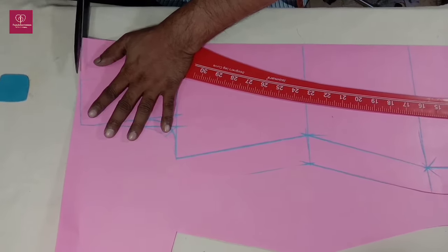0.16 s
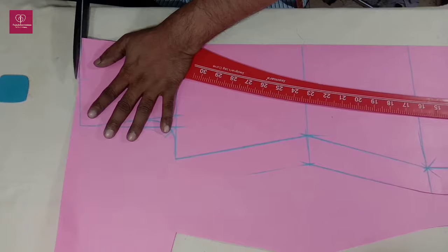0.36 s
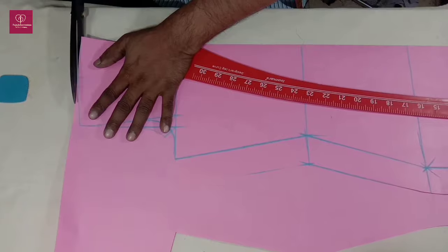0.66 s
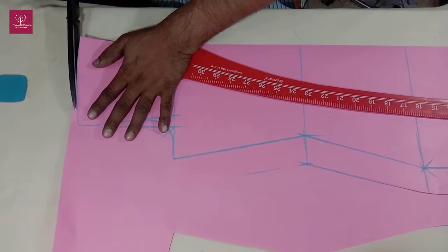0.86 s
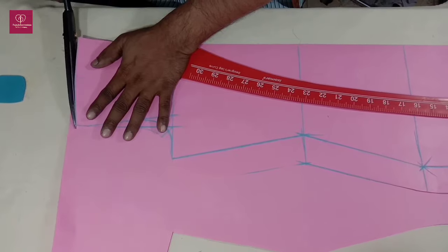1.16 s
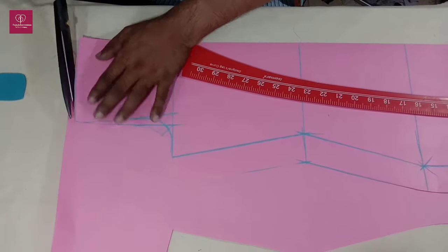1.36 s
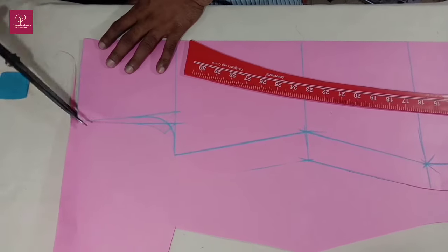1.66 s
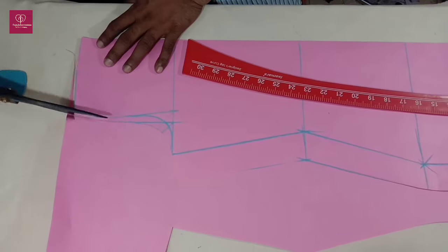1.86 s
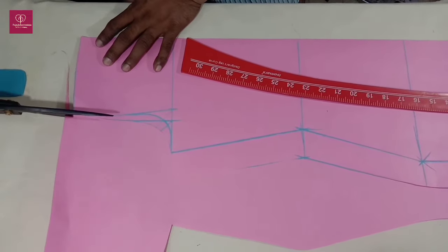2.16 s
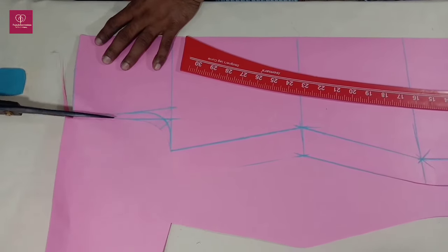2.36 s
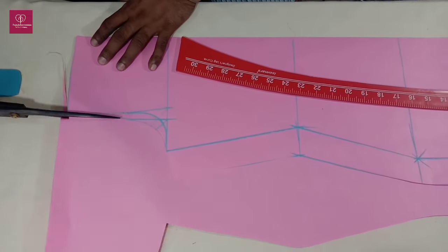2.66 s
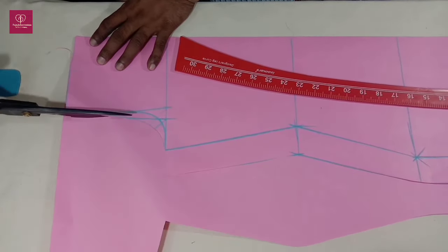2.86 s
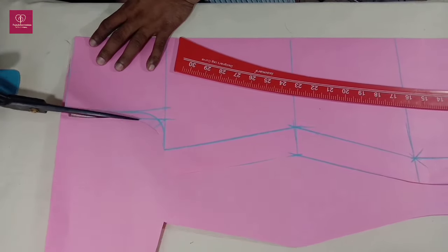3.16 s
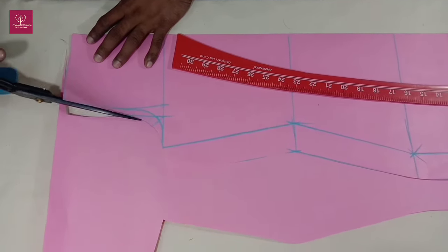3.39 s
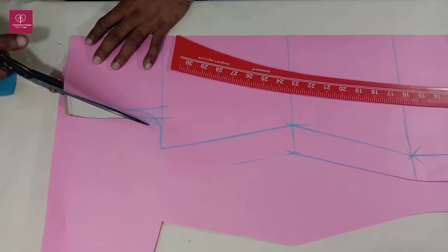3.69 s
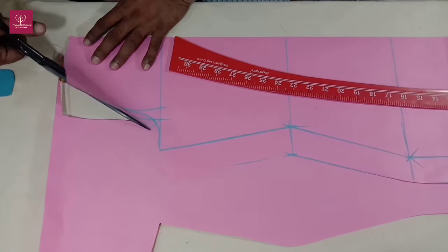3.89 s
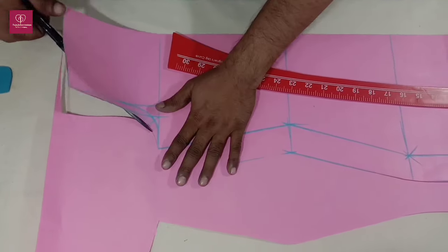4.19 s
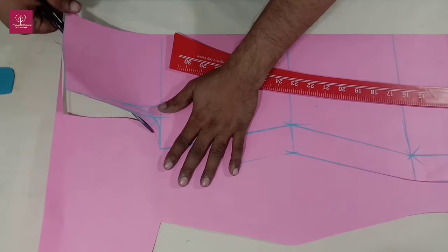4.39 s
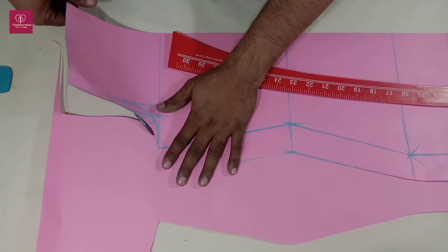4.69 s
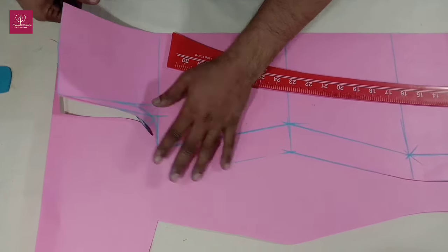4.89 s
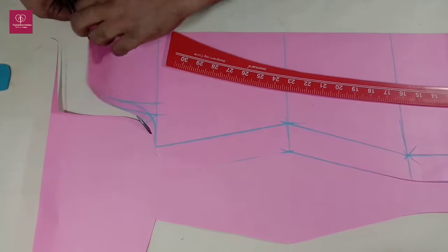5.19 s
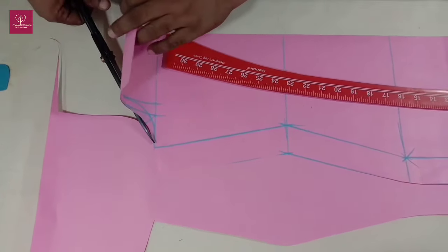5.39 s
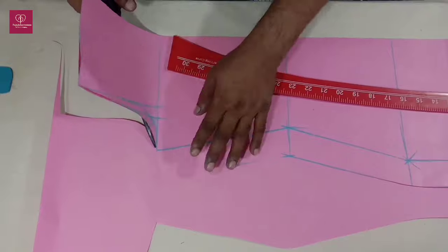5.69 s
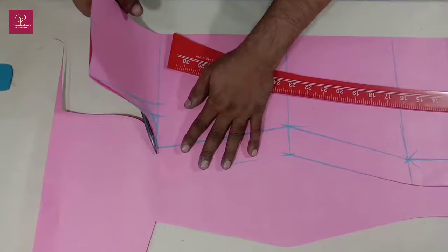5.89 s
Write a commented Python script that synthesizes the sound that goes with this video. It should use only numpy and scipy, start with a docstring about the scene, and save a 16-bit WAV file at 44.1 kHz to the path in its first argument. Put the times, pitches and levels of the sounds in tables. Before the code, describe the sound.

Crisp scissor cuts through pattern paper lying on a table, heard very near. Loud quick clips come first, then the sheet rustles and shifts, then a long run of short crackling snips with papery shaking. Tiny metallic ticks, sharp creasing snaps and dull table bumps punctuate it. The indoor space is small and nearly silent, with barely any echo.

```python
"""Scissors work quickly along a sheet of pattern paper lying on a table, close to the microphone.
Each blade stroke is a dense crackle of tearing fibres, ringing the blades and shaking the sheet.
Noise bursts make the snaps of the stiff sheet, decaying sines the bright ticks and the table knocks.
Grainy hiss and rumble make the sliding paper; a quiet small room answers over faint air noise.
The microphone's response climbs from 2 to 7 kHz and drops off above that."""
import sys
import numpy as np
from scipy import signal
from scipy.fft import rfft, irfft, next_fast_len
from scipy.io import wavfile
from scipy.ndimage import uniform_filter1d, map_coordinates

SR = 44100
rng = np.random.default_rng(int(sys.argv[2]) if len(sys.argv) > 2 else 0)


def log_audio(samples):
    """Write samples as a 16-bit WAV file to the path given in sys.argv[1]."""
    # one column per channel
    frames = np.atleast_2d(samples).T
    # limit to full scale, then quantise
    limited = np.clip(frames, -1, 1)
    pcm = np.round(limited * 32767).astype(np.int16)
    wavfile.write(sys.argv[1], SR, pcm)


N = 266805
TURN_S = 1.45  # the edge strip is off and the blades turn into the sheet


def amp(db):
    """Decibels to linear gain."""
    return 10 ** (np.asarray(db) / 20)


def unit(x):
    """Scale to an rms of 1."""
    return x / np.sqrt(np.mean(x ** 2) + 1e-20)


def along(points, hz):
    """Read a (frequency, value) curve on a log frequency axis."""
    f, value = np.transpose(points)
    return np.interp(np.log(hz + 1), np.log(f + 1), value)


def filtered(x, response):
    """Multiply the spectrum of x by a complex response of frequency."""
    m = next_fast_len(N + SR // 2)
    return irfft(rfft(x, m) * response(np.fft.rfftfreq(m, 1 / SR)), m)[:N]


def ringing(x, peaks):
    """Pass x through causal resonances, scaled so that white noise keeps its level."""
    def response(f):
        total = 0
        for k, (centre, width, db) in enumerate(peaks):
            resonance = 1j * f * width / (centre * centre - f * f + 1j * f * width)
            total = total + (-1) ** k * amp(db) * resonance  # signs alternate
        return unit(np.abs(total)) * np.exp(1j * np.angle(total))
    return filtered(x, response)


def rung(layer, rings):
    """Ring the part before the turn with the first set of peaks, the rest with the second."""
    early = np.arange(N) < TURN_S * SR
    return ringing(layer[:N] * early, rings[0]) + ringing(layer[:N] * ~early, rings[1])


def wobble(rate):
    """A smooth random curve with rate knots a second."""
    knots = rng.standard_normal(int(N * rate / SR) + 4)
    return map_coordinates(knots, [np.arange(N) * rate / SR])


def crackle(rate, spread_db, clump_db):
    """Clumped clicks, rate a second and widely scattered in size, over a little noise; rms 1."""
    struck = rng.random(N) < rate / SR
    clicks = struck * rng.standard_normal(N) * amp(spread_db * rng.standard_normal(N))
    grit = unit(clicks) + .5 * rng.standard_normal(N)
    grit = unit(grit * amp(clump_db * wobble(300)))
    return unit(np.tanh(grit / 5))  # soft limit on the tallest clicks


# blade strokes, those that follow closely being one cut:
# start_s [s], length_s [s], level_db [dB], sheet_db [dB, sheet relative to the stroke]
STROKES = [(0.0, 0.011, -48.5, -5), (0.274, 0.029, -24, -26), (0.301, 0.021, -23, -13),
           (0.447, 0.059, -40.5, -8.5), (0.538, 0.028, -22, -20), (0.573, 0.016, -21.5, -15),
           (0.676, 0.098, -50.5, -6), (0.805, 0.0092, -30.5, -6.5), (0.821, 0.026, -27, -6.5),
           (0.853, 0.017, -38.5, -2.5), (0.937, 0.071, -47.5, -24), (1.026, 0.02, -39, -3),
           (1.049, 0.014, -28.5, -8), (1.067, 0.026, -41, -1), (1.194, 0.036, -40, -6),
           (1.211, 0.032, -29.5, -10.5), (1.243, 0.013, -57, 7), (1.542, 0.015, -39.5, -9.5),
           (2.328, 0.069, -52, 3.5), (2.397, 0.03, -43, 3.5), (2.428, 0.017, -35, -5),
           (2.49, 0.018, -42.5, -3), (2.699, 0.031, -38, -2.5), (2.721, 0.039, -34, -3),
           (2.808, 0.033, -40.5, -8), (2.855, 0.075, -39.5, -13.5), (2.972, 0.016, -38, -2.5),
           (2.992, 0.045, -35.5, -2), (3.087, 0.076, -43.5, -12.5), (3.189, 0.024, -34, -2),
           (3.223, 0.017, -30.5, -1), (3.245, 0.013, -37.5, -6), (3.399, 0.018, -38, -2),
           (3.421, 0.0085, -32.5, -3), (3.454, 0.022, -33, -9), (3.571, 0.029, -36, -4.5),
           (3.599, 0.013, -31, -8), (3.655, 0.097, -44.5, -5.5), (3.747, 0.02, -38.5, -4.5),
           (3.769, 0.022, -28.5, -8), (3.838, 0.097, -42.5, -6.5), (3.941, 0.021, -29, -7),
           (3.968, 0.061, -38, -5.5), (3.992, 0.065, -38.5, -11), (4.18, 0.032, -41.5, -4.5),
           (4.214, 0.022, -35.5, -6.5), (4.245, 0.01, -33.5, -9), (4.39, 0.0098, -39, -5.5),
           (4.421, 0.031, -29, -10), (4.511, 0.028, -47, -4), (4.547, 0.074, -41, -9.5),
           (4.662, 0.025, -45, -6.5), (4.717, 0.011, -29, -11), (4.751, 0.036, -27.5, -14.5),
           (4.863, 0.044, -43, -11), (4.919, 0.048, -49.5, -15.5), (5.133, 0.04, -45, -3.5),
           (5.302, 0.044, -42, -12.5), (5.568, 0.015, -37, -13.5), (5.587, 0.029, -42.5, -10),
           (5.636, 0.019, -35.5, -10.5), (5.663, 0.018, -30.5, -7.5), (5.76, 0.12, -42, -12),
           (5.896, 0.017, -40.5, -2.5), (5.971, 0.033, -40, -4.5), (6.006, 0.018, -35, -4.5),
           (6.027, 0.019, -45, -9)]
PAUSE_S = .022  # a longer pause starts a new cut


def cut_starts():
    """For each stroke, when the cut that it belongs to began."""
    start_s, length_s = np.transpose(STROKES)[:2]
    pause_s = start_s[1:] - (start_s + length_s)[:-1]
    fresh = np.append(True, pause_s > PAUSE_S)
    return np.maximum.accumulate(start_s * fresh)


# the blades spring open after a trimming cut: start_s [s], level_db [dB]
OPENINGS = [(0.047, -40), (0.386, -43.5), (0.646, -46.5), (0.911, -46.5), (1.128, -37), (1.308, -37)]
# upper over lower rings once a cut reaches the tips: tip_db [dB], trimming then deep in the sheet
TIP_BRIGHTNESS = [-4, -2.5]
HARD_DB = -35.5  # a stroke above this level bites hard
TIP_PER_DB = 0.21  # dB brighter at the tips per dB of hard bite
PIVOT_DB, PIVOT_PER_DB = 1.5, 1.2  # dB duller at the pivot, and dB more per dB of hard bite
SWELL_DB = -3  # level change over a stroke
LEAN = 0.42  # a stroke swells towards a louder one next in the same cut, dB per dB
OPEN_S, OPEN_FADE_DB, OPEN_SHEET_DB = 0.018, -5.5, -14.5  # length, level change, sheet level
OPEN_BRIGHT_DB = 4.5  # upper over lower rings, for openings and flaps
FLAP_S, FLAP_DB, FLAP_FADE_DB, FLAP_SHEET_DB = .05, -53.5, -6, 4  # the freed strip flaps


def gestures():
    """Rows of start, length [s], level, swell, sheet, tip brightness, pivot dullness [dB], cut start [s]."""
    start_s, length_s, level_db, sheet_db = np.transpose(STROKES)
    began_s = cut_starts()
    same_cut = np.diff(began_s) == 0
    swell_db = SWELL_DB + LEAN * np.append(np.diff(level_db) * same_cut, 0)
    hard = np.clip(level_db - HARD_DB, 0, None)
    pivot_db = PIVOT_DB + PIVOT_PER_DB * hard
    tip_db = np.where(start_s > TURN_S, TIP_BRIGHTNESS[1], TIP_BRIGHTNESS[0]) + TIP_PER_DB * hard
    rows = list(zip(start_s, length_s, level_db, swell_db, sheet_db, tip_db, pivot_db, began_s))
    for at, db in OPENINGS:
        rows.append((at, OPEN_S, db, OPEN_FADE_DB, OPEN_SHEET_DB, OPEN_BRIGHT_DB, 0, at))
        rows.append((at, FLAP_S, FLAP_DB, FLAP_FADE_DB, FLAP_SHEET_DB, OPEN_BRIGHT_DB, 0, at))
    return rows


# Resonances, one set while trimming the edge and one deep in the sheet:
# centre_hz [Hz], width_hz [Hz], level_db [dB]
DULL_RINGS = [
    [(2535, 385, 6.5), (3080, 1960, 3.5), (4140, 1220, 2)],
    [(2334, 370, 5.5), (2810, 1710, -2)],
]  # blades near the pivot
BRIGHT_RINGS = [
    [(4000, 830, -2), (5990, 1400, 2), (6750, 1430, 2.5), (11200, 4200, -8)],
    [(4490, 1070, 4.5), (6000, 1840, 1), (6815, 1220, 2.5), (9700, 3300, -6)],
]  # blades near the tips
SHEET_RINGS = [
    [(340, 390, -6.5), (641, 100, 4.5), (892, 63, 3), (1310, 800, -12.5)],
    [(234, 450, -5.5), (613, 370, 0.4), (980, 294, 1.27), (1455, 520, -1.5)],
]  # bending paper
ARCH_DB = 9.5  # how strongly mid-stroke stands out: dB per squared fraction of the stroke
CLOSE_S = 0.016  # time for the pivot dullness to fade as the blades close
LEAD_S = .015  # faint lead-in before each stroke


def blades():
    """Fibres part one after another; the cracks ring the blades and shake the sheet."""
    dull, bright, sheet = np.zeros((3, N + SR))
    fibres = np.pad(crackle(7000, spread_db=3.0, clump_db=2.34), (0, SR))
    lag = np.arange(SR // 50) / SR
    for start_s, length_s, db, swell_db, sheet_db, tip_db, pivot_db, began_s in gestures():
        t = np.arange(round((length_s + .05) * SR)) / SR - LEAD_S
        rise = np.clip(.003 - t, 0, 1) / 0.02
        fall = np.clip(t - length_s + 0.0011, 0, 1) / 0.017
        start, done = round((start_s - LEAD_S) * SR), np.clip(t / length_s, 0, 1)
        arch_db = swell_db * (done - .5) - ARCH_DB * (done - .5) ** 2
        push = amp(-60 * (rise + fall)) * amp(db + arch_db)
        push, start = push[max(-start, 0):], max(start, 0)
        # every stroke is coloured anew by a short random noise tail
        tail = rng.standard_normal(len(lag)) * amp(-60 * lag / 0.011)
        tail[0] = 10  # the crack itself, heard directly
        tail = tail / np.linalg.norm(tail)
        cracks = signal.fftconvolve(push * fibres[start:][:len(push)], tail)
        # the cut moves from the pivot towards the tips
        since_s = np.clip(start / SR - began_s + np.arange(len(cracks)) / SR, 0, 1)
        bright_db = tip_db - pivot_db * np.exp(-(since_s / CLOSE_S) ** 2)
        share = 1 / (1 + amp(-2 * bright_db))  # share of the power in the upper rings
        dull[start:][:len(cracks)] += np.sqrt(1 - share) * cracks
        bright[start:][:len(cracks)] += np.sqrt(share) * cracks
        sheet[start:][:len(cracks)] += amp(sheet_db) * cracks
    steel = amp(0.28) * rung(dull, DULL_RINGS) + amp(1.0) * rung(bright, BRIGHT_RINGS)
    return steel + amp(-2.0) * rung(sheet, SHEET_RINGS)


# sharp snaps of the creasing sheet:
# start_s [s], level_db [dB, before ringing], sheet_db [dB, low sheet layer relative to the burst]
SNAPS = [(0.278, -25, -28), (0.2965, -18, -30), (0.5594, -11.5, -23), (0.7297, -34, -29),
         (1.0747, -21, -25), (1.402, -31.5, -12), (1.447, -40.5, -8), (1.8, -21, -11.5),
         (1.876, -28.5, -31), (1.9982, -33.5, 2), (2.3174, -36.5, -8), (2.6937, -36, -3), (2.7971, -31, -9),
         (3.068, -29, -9.5), (3.257, -21, -10), (3.2673, -22, -4.5), (3.2694, -27, 0), (3.293, -18.5, -13),
         (4.0584, -31.5, -2), (4.079, -35, -6), (4.2126, -17.5, -14.5), (4.3778, -30, -13),
         (4.703, -34, -9), (4.802, -38, -11), (5.1788, -42, -25), (5.185, -33, -27), (5.195, -18.5, -18),
         (5.219, -25.5, -14), (5.239, -21, -13.5), (5.428, -43, -27), (5.488, -36, -5),
         (5.5083, -35.5, -19), (5.766, -26, -17)]


def snaps():
    """Each crease gives way in a noise burst of a few milliseconds that rings blades and sheet."""
    crisp, low = np.zeros((2, N + SR))
    t = np.arange(SR // 50) / SR
    for start_s, db, sheet_db in SNAPS:
        envelope = amp(db - 60 * t / 0.015) * (1 - np.exp(-t / 0.00046))
        burst = envelope * rng.standard_normal(len(t))
        start = round(start_s * SR)
        crisp[start:][:len(t)] += burst
        low[start:][:len(t)] += amp(sheet_db) * burst
    steel = amp(-3) * rung(crisp, DULL_RINGS) + amp(-7.5) * rung(crisp, BRIGHT_RINGS)
    return steel + amp(-0.5) * rung(low, SHEET_RINGS)


# short bright ticks, as of steel on steel:
# start_s [s], level_db [dB], pitch_hz [Hz], t60_s [s, time to fall 60 dB]
PINGS = [(0.213, -44, 9500, .006), (1.626, -30, 10000, 0.0055), (1.746, -38, 7000, .005),
         (1.9984, -30, 6000, 0.0016), (5.1794, -42, 9500, .006), (5.488, -34, 5800, 0.023),
         (5.5085, -33, 9700, .008), (5.574, -24.5, 9800, 0.0069), (5.766, -26, 9700, .008)]


def pings():
    """Each tick is one slightly roughened sine that dies away briefly."""
    out, t = np.zeros(N + SR), np.arange(SR // 20) / SR
    for start_s, db, hz, t60_s in PINGS:
        noise = uniform_filter1d(rng.standard_normal(len(t)), size=20) * np.sqrt(20)
        rough = 1 + 0.49 * noise
        tick = amp(db - 60 * t / t60_s) * rough * np.sin(2 * np.pi * hz * t)
        out[round(start_s * SR):][:len(t)] += tick
    return out[:N]


# the lower blade and the hand bump the table:
# start_s [s], level_db [dB, nominal], pitch_hz [Hz, nominal, before the sag]
KNOCKS = [(0.275, -45.5, 260), (0.83, -38, 443), (1.236, -32.5, 132), (2.315, -44, 358),
          (2.362, -40.5, 430), (2.391, -40, 502), (2.743, -41, 426), (3.02, -35, 280), (3.411, -38, 378),
          (3.599, -37, 236), (3.933, -41, 193), (5.286, -44, 322), (5.486, -33.5, 261), (5.569, -33, 261),
          (5.664, -39.5, 225)]
# modes of the table top: multiple [of the knock pitch], level_db [dB], t60_s [s]
TABLE_MODES = [(0.66, -1, 0.085), (0.999, 8, 0.069), (1.9, -4, 0.11), (3.3, -4, 0.06)]


def knocks():
    """A soft blow rings the low modes of the table top at new strengths."""
    out, t = np.zeros(N + SR), np.arange(SR // 5) / SR
    sag = t * (1.05 - 1.4 * t)  # warped time: the pitch sinks as the hand settles
    for start_s, db, hz in KNOCKS:
        ring = 0
        for multiple, level_db, t60_s in TABLE_MODES:
            decay = amp(level_db + rng.normal(0, 0.58) - 60 * t / t60_s)
            ring = ring + decay * np.sin(2 * np.pi * multiple * hz * sag)
        soft_onset = 1 - np.exp(-t / 0.00082)
        out[round(start_s * SR):][:len(t)] += amp(db - 8.5) * ring * soft_onset
    return out[:N]


# the sheet sliding on the table, joined by straight lines: time_s [s], level_db [dB]
SLIDE = [(0.03, -62), (0.11, -57), (0.17, -52), (0.25, -61), (0.62, -51), (0.9, -58.5), (1.02, -52.5),
         (1.2, -58), (1.4, -49.5), (1.7, -47.5), (1.88, -38.5), (1.97, -49), (2.09, -59), (2.2, -53),
         (2.26, -62.5), (2.3, -66), (2.35, -48.5), (2.55, -51), (2.66, -60), (2.77, -53), (3.3, -47),
         (3.55, -46.5), (3.64, -53), (3.8, -49.5), (4.1, -51.5), (4.28, -50), (4.5, -58.5), (4.7, -51.5),
         (4.84, -55.5), (5.01, -62.5), (5.09, -56), (5.27, -50), (5.5, -55), (5.76, -49.5), (6.0, -56.5)]
# relative spectra of the slide: frequency_hz [Hz], level_db [dB per Hz]
HISS = [(880, -7), (1500, -8), (1980, -9), (2490, 1), (6060, -0.5), (8320, -10.5), (10100, -10),
        (13500, -24.5), (15100, -12.5), (16000, -26)]  # after the microphone
RUMBLE = [(53, -14), (90, -3.5), (160, 0.5), (287, -1.5), (1360, -9), (1900, -8.5), (2470, -34),
          (4180, -120)]  # before the microphone
STILL_DB, STILL_S, AHEAD_S = 2, 0.019, 0.025  # depth, width and lead of each steadying


def slide():
    """Paper drags in a grainy hiss that also rings the blades; a rumble follows it part way."""
    time_s, hiss_db = np.transpose(SLIDE)
    t = np.arange(N) / SR
    # the sheet is steadied ahead of each cut and each opening
    moments = np.append(np.unique(cut_starts()), np.transpose(OPENINGS)[0])
    still = sum(np.exp(-((t - at + AHEAD_S) / STILL_S) ** 2) for at in moments)
    level_db = np.interp(t, time_s, hiss_db) - STILL_DB * still
    grains = crackle(6000, spread_db=3, clump_db=1.5)
    hiss = unit(filtered(grains, lambda f: amp(along(HISS, f) - along(MICROPHONE, f))))
    hiss = hiss + amp(-17.5) * rung(grains, DULL_RINGS)
    rumble = unit(filtered(rng.standard_normal(N), lambda f: amp(along(RUMBLE, f))))
    flutter = wobble(40)
    rumble_db = -32.0 + 0.49 * level_db + 1.84 * flutter + 1.82 * wobble(6.1)
    return hiss * amp(level_db + 1.9 * flutter) + rumble * amp(rumble_db)


def room(x):
    """A short diffuse tail of decaying noise, starting 200 samples late."""
    t = np.arange(SR // 4) / SR
    tail = rng.standard_normal(len(t)) * amp(-60 * t / 0.064)
    return signal.fftconvolve(np.pad(x, (200, 0)), tail / np.linalg.norm(tail))[:N]


# relative spectrum of the still air, after the microphone: frequency_hz [Hz], level_db [dB per Hz]
AIR = [(15, -34), (25, 9), (48, -6), (120, -16), (427, -25), (1940, -27), (2480, -26), (5880, 6),
       (13200, -43), (14800, -18), (16000, -15)]


def air():
    """The still air of the room: steady shaped noise, rms 1."""
    noise = rng.standard_normal(N)
    return unit(filtered(noise, lambda f: amp(along(AIR, f) - along(MICROPHONE, f))))


def scene():
    """Everything on the table, its echo and the still air."""
    near = blades() + snaps() + pings() + knocks() + slide()
    return (near + amp(-17.5) * room(near) + amp(-79.5) * air())[None]


# microphone response: frequency_hz [Hz], gain_db [dB]
MICROPHONE = [(1500, 0), (2000, -5.5), (2350, -1), (7200, 4), (8000, -6), (10500, -6.5), (13500, -14),
              (15000, -4.5)]
TOP_HZ = 15800  # band limit


def record(dry):
    """Microphone colour, then nothing from the band limit up."""
    return filtered(dry[0], lambda f: amp(along(MICROPHONE, f)) * (f < TOP_HZ))[None]


dry = scene()
out = record(dry)
log_audio(out)
```